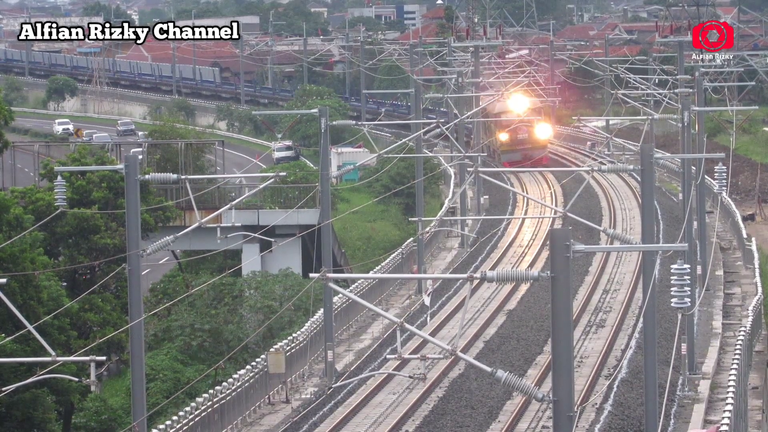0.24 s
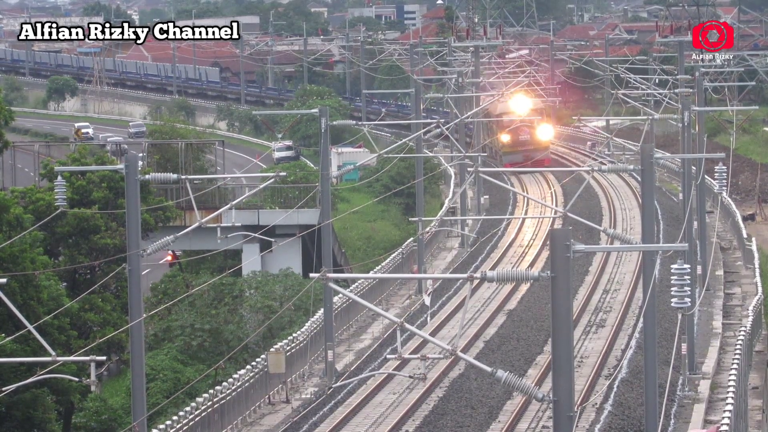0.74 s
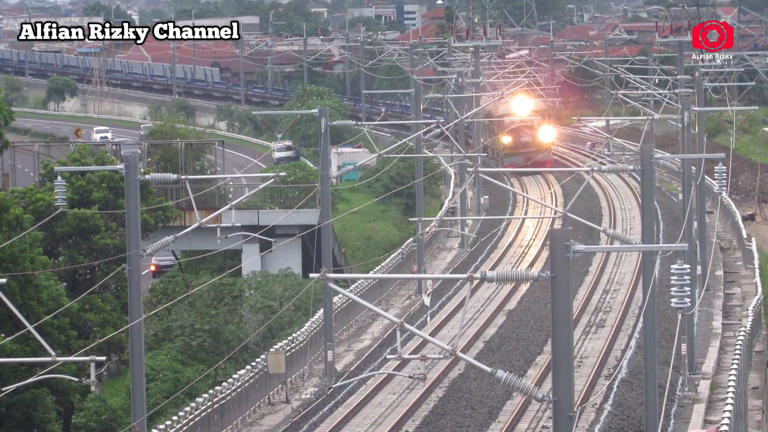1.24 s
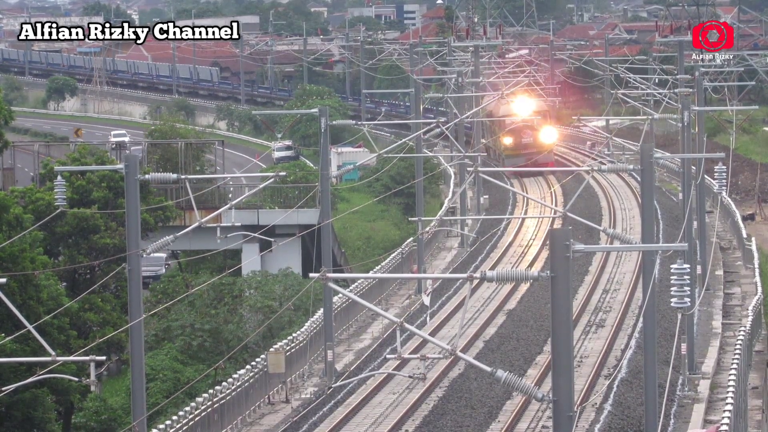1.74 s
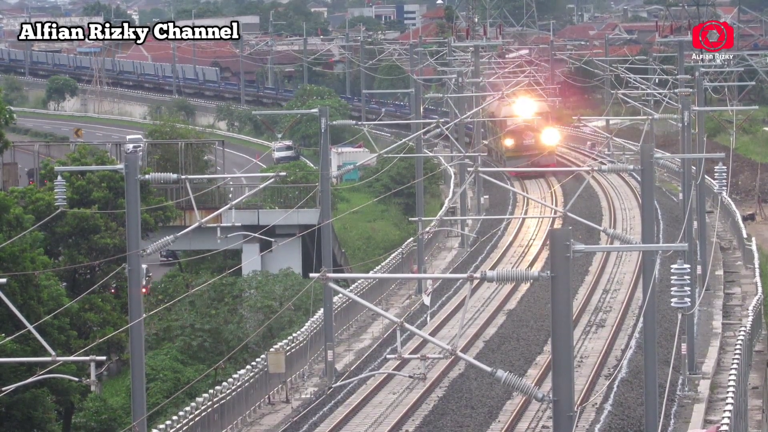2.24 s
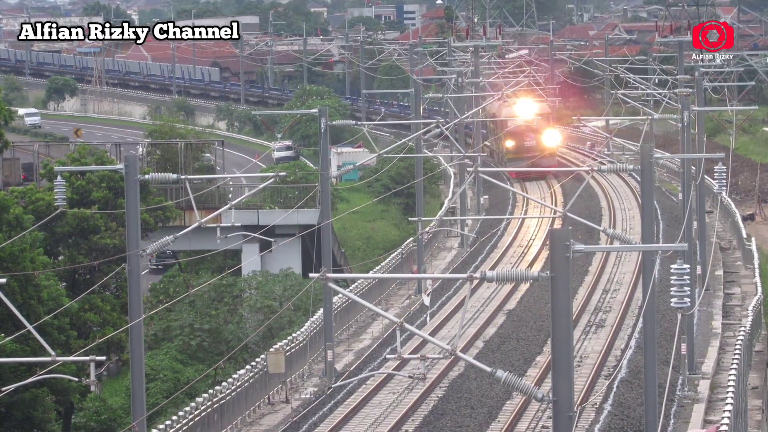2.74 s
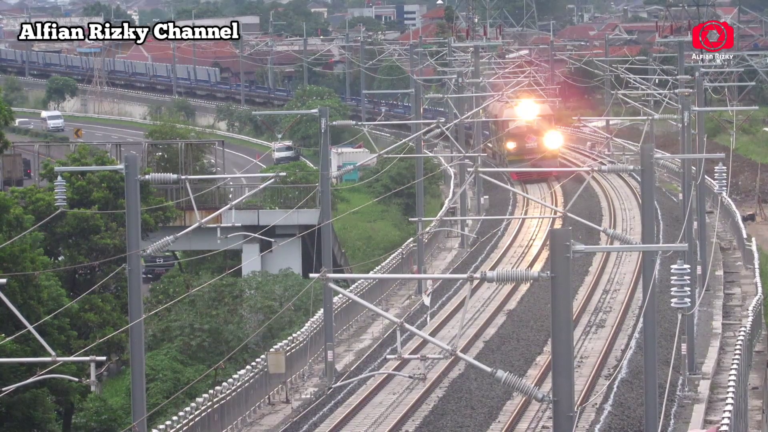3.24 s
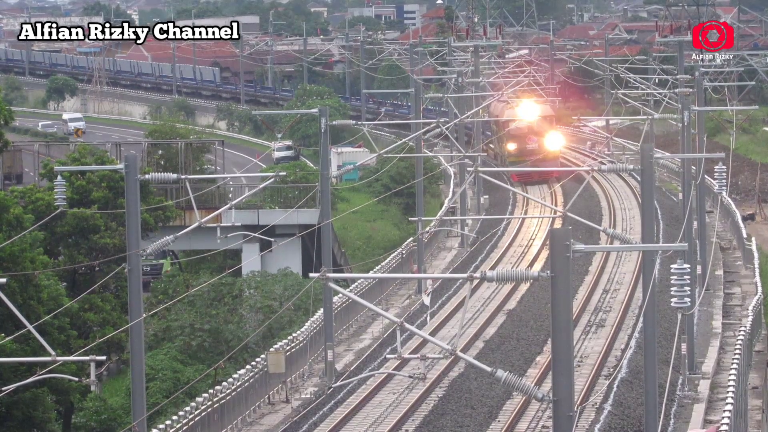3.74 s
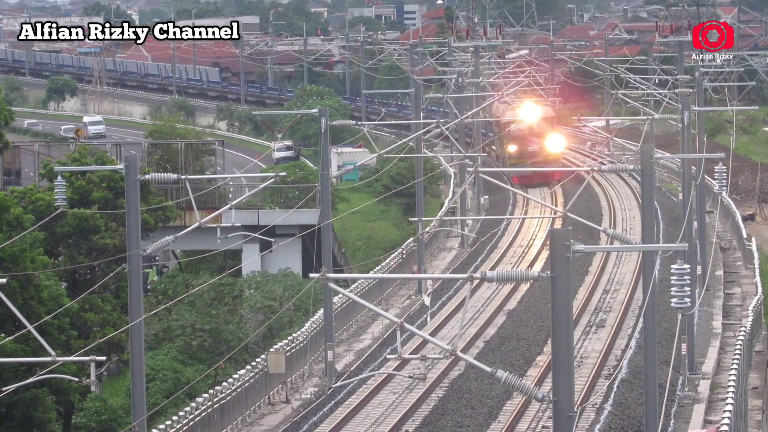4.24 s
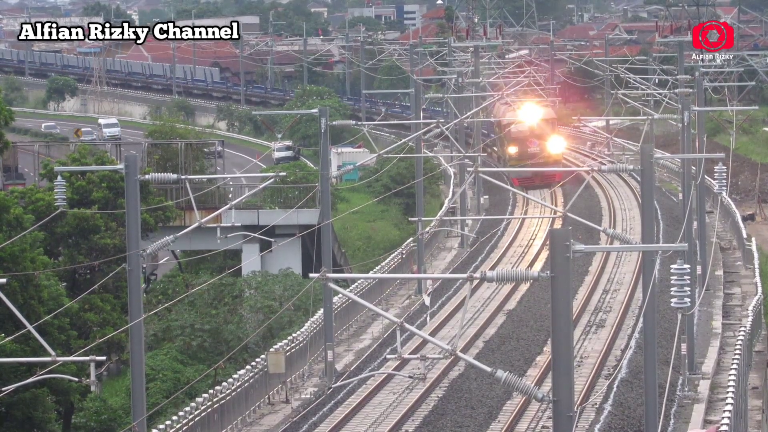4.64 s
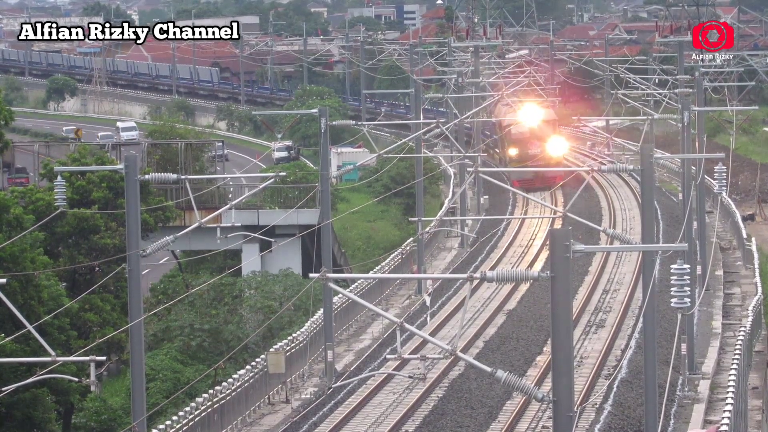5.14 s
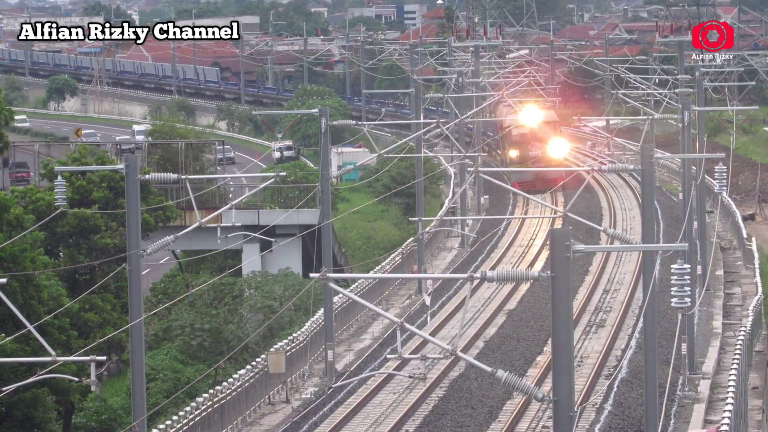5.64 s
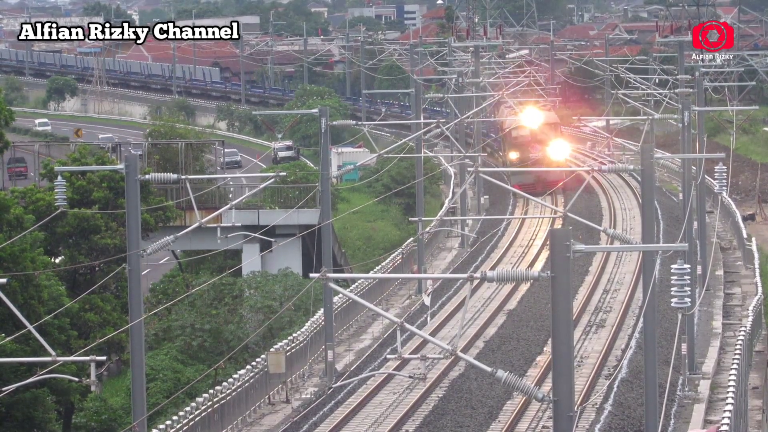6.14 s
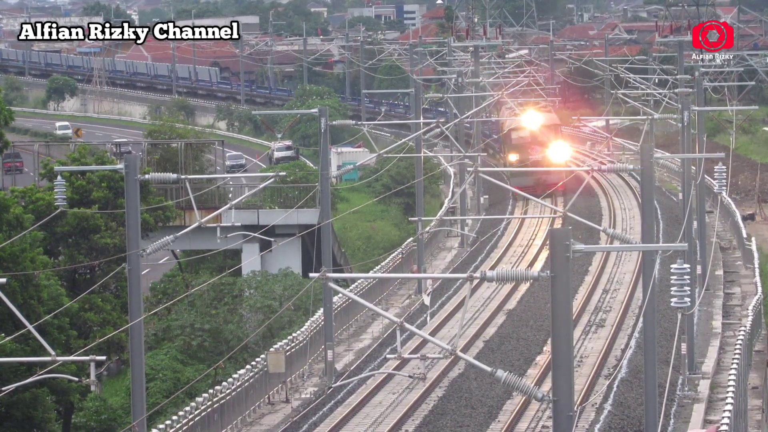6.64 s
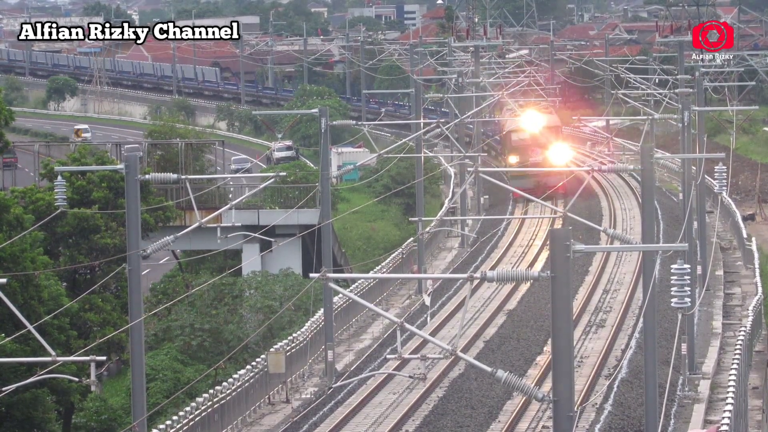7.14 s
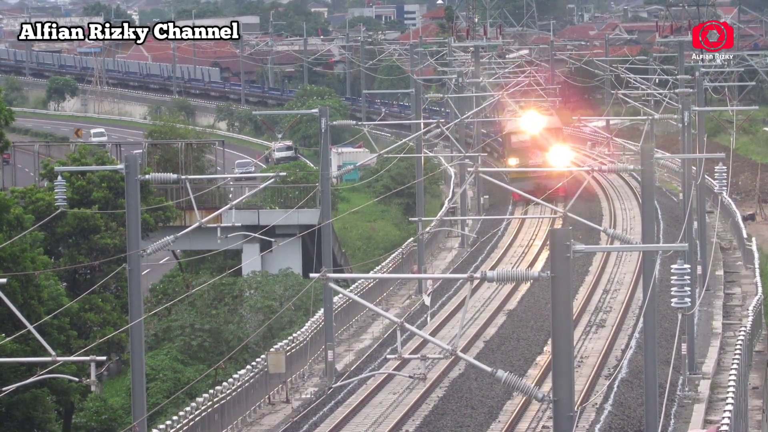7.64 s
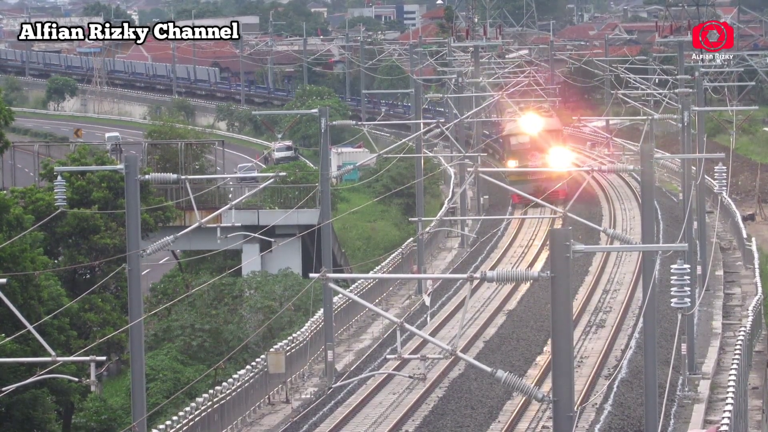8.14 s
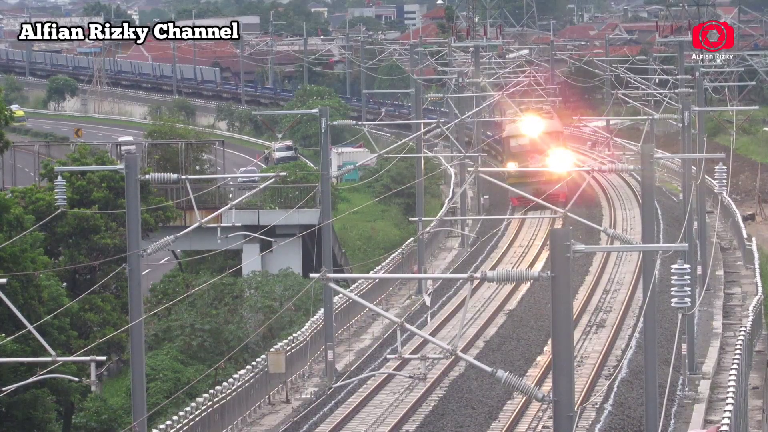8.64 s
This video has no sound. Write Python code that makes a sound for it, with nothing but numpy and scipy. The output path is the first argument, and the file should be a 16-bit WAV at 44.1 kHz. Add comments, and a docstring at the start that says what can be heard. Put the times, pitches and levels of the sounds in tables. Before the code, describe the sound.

Tinny, sputtering motorcycle pops fade out, followed by the rising engine drone and tyre hiss of passing vehicles.

```python
"""Popping motorcycle and swelling traffic

A motorcycle exhaust pops unevenly, each pop ringing the pipe with a tinny crack of gas, then dies away.
After a short lull a stream of cars, trucks and motorcycles swells up: a drone of many engines, tyre roar
and hiss, with passing growls, faint brakes and two puffs of wind. The two microphone ports hear the bass
in opposite phase, louder on the right."""
import sys
import numpy as np
from scipy import signal
from scipy.fft import rfft, irfft, next_fast_len
from scipy.io import wavfile
from scipy.ndimage import uniform_filter1d

SR = 44100
rng = np.random.default_rng(int(sys.argv[2]) if len(sys.argv) > 2 else 0)


def master(y):
    """Save y as 16-bit WAV."""
    cut = np.clip(np.atleast_2d(y).T, -1, 1)
    pcm = np.round(cut * 32767)  # scale
    wavfile.write(sys.argv[1], SR, pcm.astype(np.int16))


N = 392049
TIME = np.arange(N) / SR
FFT_SIZE = next_fast_len(N + SR // 2, True)
FFT_SIZE += FFT_SIZE % 2
FREQ = np.maximum(np.arange(FFT_SIZE // 2 + 1) * SR / FFT_SIZE, 1)
TOP_HZ = 15300

# Exhaust pops. Each row: start in seconds, relative thump level in dB.
POPS = [(0.0094, -6), (0.0292, -4.5), (0.0563, -5.5), (0.0838, -9), (0.0982, -6), (0.1603, -6),
        (0.1761, -4), (0.206, -5), (0.2316, -6.5), (0.2576, -6), (0.2817, -8), (0.3072, -4), (0.3311, -10),
        (0.3557, -1.5), (0.521, -6.5), (0.539, -7.5), (0.5626, -9), (0.6098, -5.5), (0.6604, -4.5),
        (0.7013, -7.5), (0.7435, -5.5), (0.8118, -3), (0.8422, -7.5), (0.9097, -4), (0.9617, -1.5),
        (1.004, -3.5), (1.0353, -4), (1.053, -5), (1.0711, -5), (1.107, -7), (1.1362, -5), (1.2358, -7.5),
        (1.279, -6.5), (1.3073, -7.5), (1.3367, -8), (1.3657, -8), (1.4017, -7), (1.4301, -6), (1.4588, -7),
        (1.5511, -4.5), (1.5783, -6), (1.6204, -10.5), (1.6501, -6), (1.6909, -6), (1.72, -6),
        (1.7906, -3.5), (1.8322, -5), (1.859, -5.5), (1.9258, -4.5), (1.9575, -4), (1.9764, -8),
        (2.0074, -4.5), (2.019, -5.5), (2.0516, -5), (2.0721, -3.5), (2.091, -6.5), (2.144, -3.5),
        (2.1878, -4.5), (2.2328, -4), (2.2992, -4.5), (2.3854, -4.5), (2.441, -9), (2.5603, -9),
        (2.6039, -7.5), (2.6557, -7.5), (2.7075, -7), (2.7303, -15), (2.7518, -9), (2.782, -12),
        (3.08, -12.5)]
# The motorcycle's beat. Each row: time in seconds, firings per second.
FIRING_RATE = [(0, 80), (.55, 86), (.65, 113), (1.2, 108), (1.25, 63), (1.8, 77), (2.05, 92), (2.2, 109),
               (2.5, 140)]
# The engine cuts out. Each row: start and end in seconds.
MISFIRES = [(0.866, 0.98), (1.18, 1.225), (2.33, 2.38), (2.49, 2.6), (2.82, 3.45)]
# The motorcycle's effort. Each row: time in seconds, exhaust note in Hz, relative rasp level in dB.
THROTTLE = [(0, 189, -16.5), (.38, 208, -18), (.46, 171.6, -13.5), (.6, 167.3, -15), (.8, 163.7, -31),
            (1.15, 166.4, -36), (1.25, 135, -54), (1.75, 140, -18.5), (1.93, 165, -20.5),
            (2.04, 183.4, -19.5), (2.3, 181, -23), (2.39, 138, -22), (2.45, 136, -41)]
# The pipe's boom at low revs. Each row: centre in Hz, width in Hz, relative level in dB.
PIPE_MODES = [(135.4, 86, 2), (254.4, 55, 2), (420, 133, -5.5)]
# Rasp that opens with the throttle. Each row: centre in Hz, width in Hz, relative level in dB.
THROAT_MODES = [(897, 140, 3), (1270, 270, -5.5)]
# The silencer's tinny edge as the engine labours. Each row: centre in Hz, width in Hz, full boost in dB.
TIN_MODES = [(2830, 290, 4), (5500, 170, 2.5), (7200, 210, 3.5)]
# Tone of the escaping gas. Each row: frequency in Hz, relative level in dB.
CRACK_COLOUR = [(1400, 18), (2700, 20.5), (4200, 12.5), (6500, 14.5), (11500, 11), (15000, 1.5)]
# Treble lift on the cracks. Each row: time in seconds, tilt in dB per octave.
CRACK_TILT = [(0.8, 0), (1.5, 1), (2.1, 2.5)]
# Bite of the pops. Each row: time in seconds, crack trim in dB.
CRACK_BITE = [(.1, -29.5), (.19, -40.5), (.27, -30.5), (.35, -33.5), (.66, -28.5), (.8, -35.5), (1.14, -39),
              (1.31, -28), (2.08, -30.5), (2.3, -32.5)]

# Swells of the massed engines and of the tyres. Each row: time in seconds, relative level in dB.
DRONE_SWELL = [(2.85, -37.5), (3.7, -35.5), (4.0, -31), (5.25, -28), (5.4, -32.5), (6.4, -29), (6.7, -30),
               (7.1, -28), (7.65, -28.5), (8.1, -31.5), (8.89, -28.5)]
TYRE_SWELL = [(0.2, -42), (1.22, -52), (2.44, -48), (3.13, -46), (4.7, -34.5), (5.48, -38), (7.06, -34.5),
              (8.75, -36)]
# Two engines that stand out. Each row: time in seconds, firing rate in Hz, relative level in dB.
LEAD_ENGINE = [(4.75, 194.2, -34.5), (5.15, 187, -25), (5.45, 184, -34.5), (5.85, 164.1, -27.5),
               (6.5, 159.8, -30), (7.25, 170.2, -32), (7.75, 183.3, -34.5), (8.15, 187.5, -30),
               (8.55, 186.1, -27.5), (8.89, 182, -27.5)]
SECOND_ENGINE = [(4.2, 124.7, -26), (4.55, 129.7, -22.5), (4.95, 134.9, -22.5), (5.05, 157, -25),
                 (5.25, 154.5, -17)]
# Close pass-bys. Each row: peak time, rise and fall in seconds, then rush and hiss levels in dB.
PASS_BYS = [(4.82, 0.2, 0.078, -46.5, -50), (5.18, 0.077, 0.08, -45.5, -50.5), (5.65, 0.29, 0.81, -51, -55),
            (6.85, 0.039, 0.33, -42, -50.5), (7.58, 0.055, 0.15, -61, -50.5),
            (7.85, 0.13, 0.42, -64, -50.5)]
# Growls and brake squeals. Each row: peak time and half length in seconds, pitch in Hz, level in dB.
GROWLS = [(4.255, 0.28, 257.4, -32.5), (4.806, 0.083, 2660, -50), (6.18, 0.26, 381, -34.5),
          (6.93, 0.14, 2850, -49.5), (7.084, 0.05, 227, -28), (7.59, 0.075, 226, -26.5)]
SQUEALS = [(8.18, 0.093, 2789, -60), (8.2, .08, 3171, -59)]
# Wind puffs. Each row: peak time and half length in seconds, level in dB.
GUSTS = [(3.92, .06, -24), (8.7, .07, -23)]
# Tone of each traffic and wind layer. Each row: frequency in Hz, relative level in dB.
DRONE_COLOUR = [(40, -35), (75, -9), (120, 0.5), (165, -1), (230, -4.5), (310, -8), (400, -9.5), (520, -17),
                (750, -23.5), (1500, -59)]
RUMBLE_COLOUR = [(15, -31), (40, 9), (65, 24), (90, 22.5), (160, -62)]
TYRE_COLOUR = [(500, 3), (900, 4), (1300, 3.5), (2000, -6.5), (3000, -14), (15000, -63)]
HISS_COLOUR = [(1500, -38), (3000, 10), (8000, 5.5), (13800, -1), (15000, -31)]
RUSH_COLOUR = [(500, -15), (1400, -5), (2300, -3.5), (6000, -20), (14000, -37)]
WIND_COLOUR = [(20, -12), (70, 17), (200, 6), (700, -44)]
# Left port against right. Each row: frequency in Hz, level offset in dB, phase lead in radians.
PORT_BALANCE = [(100, -9.3, 3.1), (450, -8, 2.6), (1020, -5, 1.97), (2000, -2.5, 0.87), (4580, -5.5, .05),
                (7800, -8, 1.35), (13900, -13, 1.56)]


def motorcycle(thump_db=27, crack_db=-1, rasp_db=5, note_decay_s=0.05, rasp_s=0.004, steady_flow=0.13):
    """Each firing thumps the pipe, keeps its note ringing, rasps in its throat and cracks with gas."""
    blows, cracks, turbulence = np.zeros(N), np.zeros((2, N)), rng.standard_normal(N)
    note_hz, tilt, bite_db = curve(THROTTLE), curve(CRACK_TILT), curve(CRACK_BITE)
    revs = (note_hz - note_hz.min()) / np.ptp(note_hz)
    mean_pop_db = np.mean([db for _, db in POPS])
    for s, blow_db, gas_db in [(s, db, 0) for s, db in POPS] + soft_firings(mean_pop_db):
        start = int(s * SR)
        blows[start] += undb(blow_db)
        burst = gas_crack(1 - revs[start], tilt[start])
        # the brighter the exhaust, the more the soft firings crack too
        burst_db = blow_db + bite_db[start] + gas_db + (gas_db < 0) * tilt[start] + crack_db
        cracks[:, start:start + burst.shape[1]] += undb(burst_db) * burst
    sustain = uniform_filter1d(running() * np.tanh(.5 * ring_out(blows, note_decay_s)), size=300)
    flow = (ring_out(blows, rasp_s) + steady_flow * sustain) * undb(curve(THROTTLE, column=2) + rasp_db)
    rasp = filtered(flow * turbulence, resonances(THROAT_MODES))
    sizzle = gas_sizzle(sustain * undb(bite_db + mean_pop_db + tilt))
    return cracks + sizzle + rasp + sustain * exhaust_note() - undb(thump_db) * pipe_thump(blows, revs)


def soft_firings(pop_db, soft_db=-10.5, gas_db=-2, throttle_share=0.21, scatter_db=2.5):
    """The putter between pops. Each row: start in seconds, thump level in dB, crack trim in dB."""
    firings, cycles, fires = [], crank(FIRING_RATE), running()
    throttle_db = curve(THROTTLE, column=2)
    level_db = pop_db + soft_db + throttle_share * (throttle_db - throttle_db.max())
    for (start, _), (end, _) in zip(POPS, POPS[1:]):
        first, last = np.round(np.interp([start, end], TIME, cycles))
        times = np.interp(np.arange(first + 1, last), cycles, TIME)
        for s, scatter in zip(times, rng.standard_normal(64)):
            if fires[int(s * SR)]:
                firings.append((s, level_db[int(s * SR)] + scatter_db * scatter, gas_db))
    return firings


def pipe_thump(blows, revs, hot_stretch=1.08):
    """Blows ring the pipe; with the revs the gas runs hotter and the pipe rings higher."""
    hot_modes = [(hz * hot_stretch, width * hot_stretch, db) for hz, width, db in PIPE_MODES]
    cool = filtered(blows * (1 - revs), resonances(PIPE_MODES))
    return cool + filtered(blows * revs, resonances(hot_modes))


def exhaust_note(level_db=-23.5, octave_db=-7, lag_s=0.0013):
    """The pipe's hum and its octave, fullest when the engine runs slowly."""
    fullness = FIRING_RATE[0][1] / curve(FIRING_RATE)
    phase = 2 * np.pi * np.interp(TIME - lag_s, TIME, crank(THROTTLE))
    return undb(level_db) * fullness * (np.cos(phase) + undb(octave_db) * np.cos(2 * phase))


def gas_crack(tinny, tilt, peak_s=0.0011, rise_s=0.00019, decay_s=0.0024, tail_s=0.09, tail_db=-27):
    """A burst of gas swells and shuts with the port, leaving a faint tail; no two sound quite alike."""
    age, freq = TIME[:4096] - peak_s, np.fft.rfftfreq(4096, 1 / SR)
    ripple_db = 6 * np.interp(freq, np.linspace(0, TOP_HZ, 24), rng.standard_normal(24))
    tin_db = tinny * sum(db * bell(freq, hz, width) for hz, width, db in TIN_MODES)
    lift_db = tilt * np.log2(np.maximum(freq, CRACK_COLOUR[0][0]))
    colour_db = np.interp(freq, *np.transpose(CRACK_COLOUR)) + ripple_db + tin_db + lift_db
    common, *sides = rng.standard_normal((3, len(age)))
    gas = unit_rms(irfft(rfft(common + np.array(sides) / np.sqrt(2)) * undb(colour_db)))
    attack = bell(np.minimum(age, 0), 0, rise_s)
    since_peak = np.maximum(age, 0)
    return gas * attack * (np.exp(-since_peak / decay_s) + undb(tail_db) * np.exp(-since_peak / tail_s))


def gas_sizzle(envelope, trim_db=-15.5, grain_db=3):
    """Gas keeps hissing from the silencer between the cracks, in uneven spits."""
    return noise(CRACK_COLOUR, width=2 / 3) * envelope * undb(trim_db + grain_db * wander(150))


def crank(rate_table):
    """Running count of cycles; the rate gives a little so that each pop lands on the beat."""
    cycles, pop_times = np.cumsum(curve(rate_table)) / SR, np.array(POPS)[:, 0]
    slip = np.unwrap(np.interp(pop_times, TIME, cycles) % 1, period=1)
    return cycles - np.interp(TIME, pop_times, slip)


def running():
    """1 while the engine fires, 0 while it cuts out."""
    return 1.0 - np.any([(TIME > start) & (TIME < end) for start, end in MISFIRES], axis=0)


def traffic_drone(trim_db=3, drift=.07, scatter_db=2.5, wash=0.65, rumble_db=-12, rumble_growth=0.46):
    """Many engines fire at drifting rates; reflections smear them into a wash over a deep rumble."""
    firings = np.zeros(N)
    for hz in np.geomspace(43, 97, num=5):
        cycles = np.cumsum(hz * (1 + drift * wander(2) + .008 * wander(40))) / SR + rng.random()
        starts = np.flatnonzero(np.diff(np.floor(cycles)))
        firings[starts] += undb(scatter_db * rng.standard_normal(2048)[:len(starts)])
    exhausts = unit_rms(filtered(firings - firings.mean(), minimum_phase(undb(spectrum(DRONE_COLOUR)))))
    level_db = curve(DRONE_SWELL) + trim_db
    # heavy vehicles come with the thick of the traffic, so the rumble grows faster than the rest
    weight_db = rumble_db + rumble_growth * (level_db - level_db.max())
    rumble = noise(RUMBLE_COLOUR, width=0.054) * undb(weight_db + 2 * wander(5.3))
    return (unit_rms(exhausts + wash * noise(DRONE_COLOUR, width=0.056)) + rumble) * undb(level_db)


def single_engine(track, trim_db, overtone_db, roughness, hold_s=0.07, fade_s=0.026):
    """One engine's firing note with its overtones, wavering as it comes and goes."""
    hz = curve(track) * (1 + 0.01986 * wander(25) + .02 * wander(5))
    phase = 2 * np.pi * np.cumsum(hz) / SR
    note = np.sin(phase) + undb(overtone_db) * (np.sin(2 * phase) + 0.3 * np.sin(3 * phase))
    fade = np.clip(np.minimum(TIME - track[0][0], track[-1][0] + hold_s - TIME) / fade_s, 0, 1)
    return unit_rms(note) * (1 + roughness * wander(35)) * fade * undb(curve(track, column=2) + trim_db)


def tyre_roar(trim_db=1, flutter_db=0.8):
    """Tyres roar on the asphalt."""
    return noise(TYRE_COLOUR, width=0.13) * undb(curve(TYRE_SWELL) + trim_db + flutter_db * wander(16))


def pass_bys(hiss_db=-53, growth=0.81, far_db=-73, flutter_db=0.8, air_hz=10000, air_loss=0.86):
    """Hiss grows with the tyre roar; each near vehicle adds more, and a rush that swells and falls."""
    tyre_db = curve(TYRE_SWELL)
    hiss_power = undb(hiss_db + growth * (tyre_db - tyre_db.max())) ** 2 + undb(far_db) ** 2
    rush_swell = np.zeros(N)
    for s, rise, fall, rush_db, near_db in PASS_BYS:
        nearness = bell(TIME, s, np.where(TIME < s, rise, fall))
        hiss_power += (undb(near_db) * nearness) ** 2
        rush_swell += undb(rush_db) * nearness
    level_db = 10 * np.log10(hiss_power) + flutter_db * wander(25)
    hiss = noise(HISS_COLOUR, width=0.48)
    # the air takes the top off the hiss of vehicles that are further away
    top = filtered(hiss, 1 / (1 + (air_hz / FREQ) ** 8))
    top_gain = undb(air_loss * (level_db - np.median(level_db[N // 2:])))
    return (hiss + top * (top_gain - 1)) * undb(level_db) + noise(RUSH_COLOUR, width=0.026) * rush_swell


def growls(width_share=0.11, rough_db=3):
    """Grainy resonances swell and fade as single vehicles go by."""
    mix = np.zeros(N)
    for s, half_s, hz, db in GROWLS:
        grain = rng.standard_normal(N) * undb(rough_db * wander(70))
        growl = unit_rms(filtered(grain, resonances([(hz, hz * width_share, 0)])))
        mix += growl * undb(db) * bell(TIME, s, half_s)
    return mix


def brakes(waver=0.00381):
    """Thin, unsteady brake squeals in the distance."""
    mix = np.zeros(N)
    for s, half_s, hz, db in SQUEALS:
        phase = 2 * np.pi * np.cumsum(hz * (1 + waver * wander(40))) / SR
        mix += unit_rms(np.sin(phase)) * undb(db) * bell(TIME, s, half_s)
    return mix


def wind():
    """Brief puffs buffet the left port alone."""
    strength = sum(undb(db) * bell(TIME, s, half_s) for s, half_s, db in GUSTS)
    return noise(WIND_COLOUR, width=1) * strength * np.array([[1], [0]])


def undb(db):
    """Decibels to gain."""
    return 10 ** (np.asarray(db) / 20)


def unit_rms(x):
    """Scale to rms 1."""
    return x / np.sqrt(np.mean(x ** 2))


def bell(x, centre, width):
    """A smooth Gaussian rise and fall."""
    return np.exp(-.5 * ((x - centre) / width) ** 2)


def ring_out(blows, decay_s):
    """An envelope that jumps at every blow and dies away."""
    return signal.lfilter([1], [1, -np.exp(-1 / (SR * decay_s))], blows)


def wander(rate_hz):
    """A glide between random values, at rms 1."""
    return unit_rms(np.interp(TIME * rate_hz, np.arange(2048), rng.standard_normal(2048)))


def curve(table, column=1):
    """An automation curve: one column of a time table at every sample."""
    rows = np.array(table)
    return np.interp(TIME, rows[:, 0], rows[:, column])


def spectrum(table, column=1):
    """An EQ curve: one column of a frequency table at every bin."""
    rows = np.array(table)
    return np.interp(np.log(FREQ), np.log(rows[:, 0]), rows[:, column])


def filtered(x, response):
    """Pass a sound through a frequency response."""
    return irfft(rfft(x, FFT_SIZE) * response, FFT_SIZE)[..., :N]


def minimum_phase(gain):
    """A response with this gain that rings only after the blow."""
    cepstrum = irfft(np.log(gain + 1e-6))
    cepstrum[1:FFT_SIZE // 2] *= 2
    cepstrum[FFT_SIZE // 2 + 1:] = 0
    return np.exp(rfft(cepstrum))


def resonances(modes):
    """The response of a few steep, ringing peaks."""
    peaks = (undb(db) / (1 + ((FREQ / hz - hz / FREQ) * hz / width) ** 2) for hz, width, db in modes)
    return minimum_phase(sum(peaks))


def noise(colour, width):
    """Coloured stereo noise; width runs from 0 (mono) to 1 (unrelated sides)."""
    common, *sides = rng.standard_normal((3, N))
    white = np.sqrt(1 - width) * common + np.sqrt(width) * np.array(sides)
    return unit_rms(filtered(white, undb(spectrum(colour))))


def scene():
    """The stream of traffic, a little wind and the popping motorcycle."""
    lead = single_engine(LEAD_ENGINE, trim_db=-0.5, overtone_db=-17, roughness=0.38)
    second = single_engine(SECOND_ENGINE, trim_db=-9, overtone_db=-31, roughness=0.27)
    traffic = traffic_drone() + lead + second + tyre_roar() + pass_bys() + growls() + brakes()
    return traffic + wind() + motorcycle()


def record(dry, notch_hz=686, notch_width_hz=300, notch_floor_db=-19):
    """A hollow notch colours both ports; the left is weaker and turned in phase; the top is cut."""
    detune = 1j * (FREQ / notch_hz - notch_hz / FREQ) * notch_hz / notch_width_hz
    notch = (undb(notch_floor_db) + detune) / (1 + detune)
    left = undb(spectrum(PORT_BALANCE)) * np.exp(1j * spectrum(PORT_BALANCE, column=2))
    # the mean of the two ports keeps the level of the sound
    ports = np.array([left, np.ones_like(left)]) * 2 / np.abs(1 + left)
    high_cut = signal.ellip(10, .2, 80, TOP_HZ, fs=SR, output="sos")
    return signal.sosfilt(high_cut, filtered(dry, notch * ports))


dry = scene()
out = record(dry)
master(out)
```